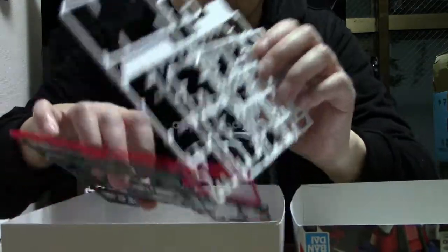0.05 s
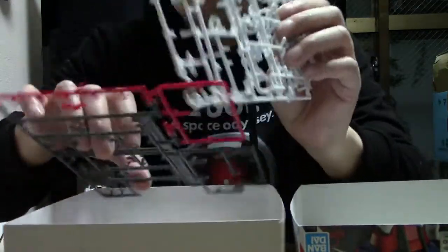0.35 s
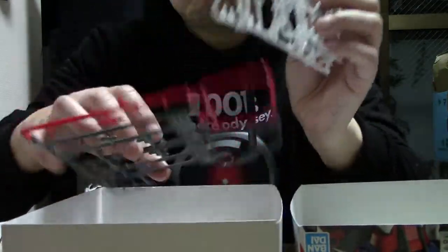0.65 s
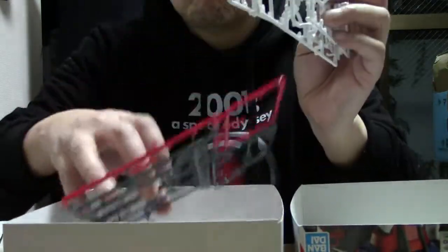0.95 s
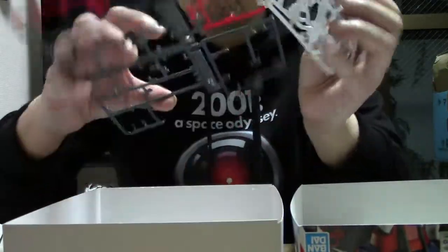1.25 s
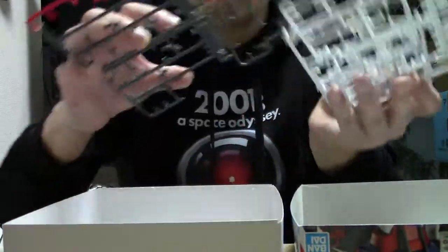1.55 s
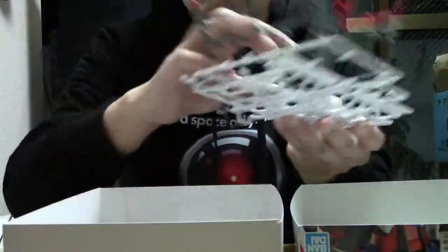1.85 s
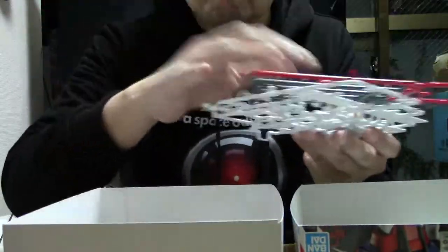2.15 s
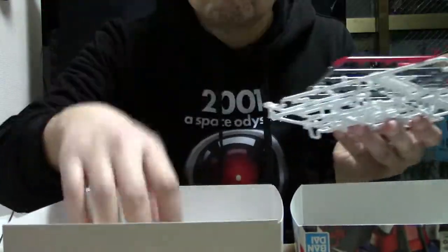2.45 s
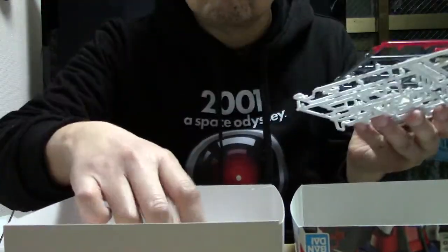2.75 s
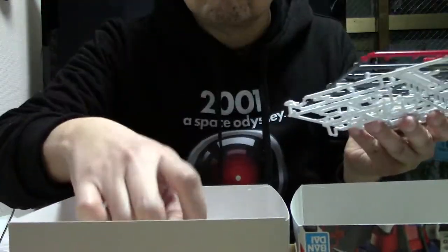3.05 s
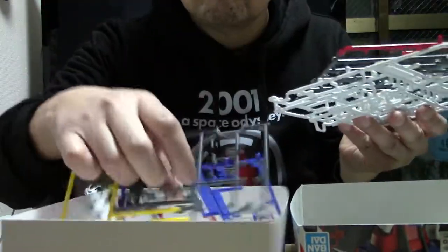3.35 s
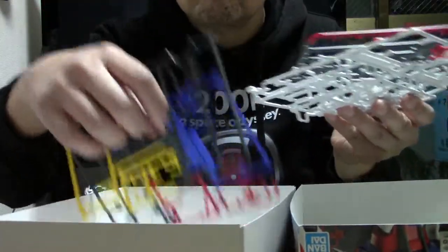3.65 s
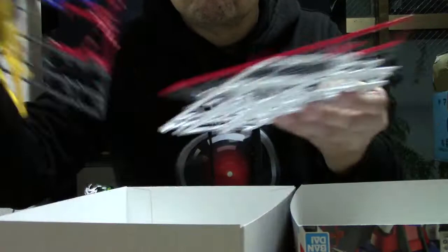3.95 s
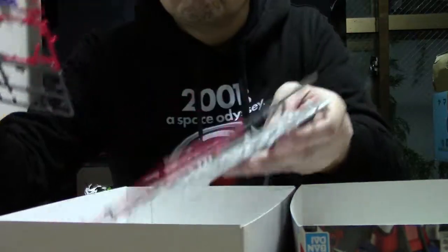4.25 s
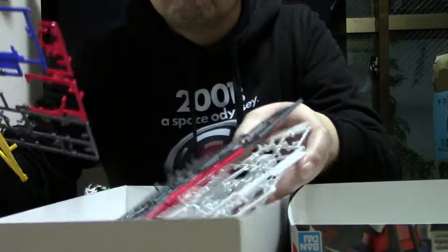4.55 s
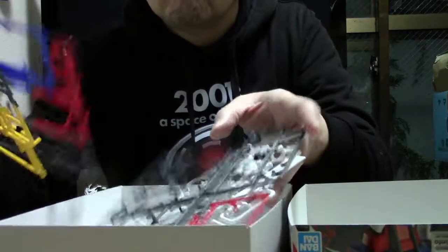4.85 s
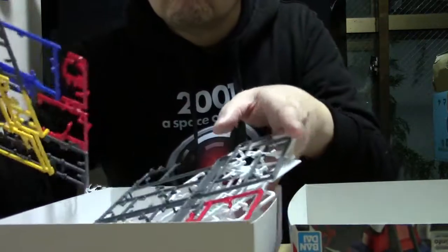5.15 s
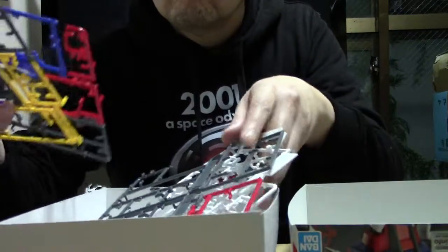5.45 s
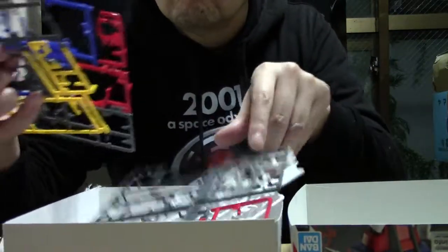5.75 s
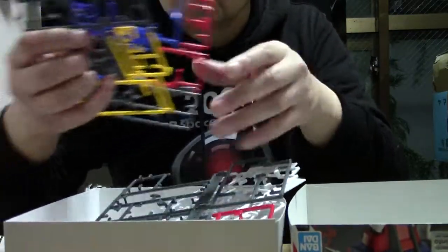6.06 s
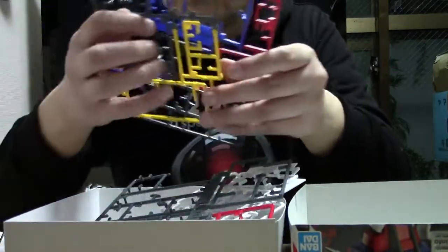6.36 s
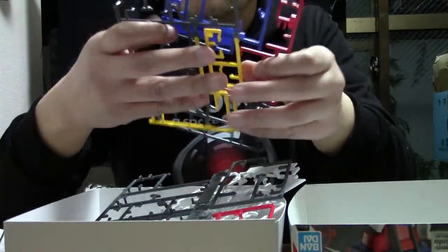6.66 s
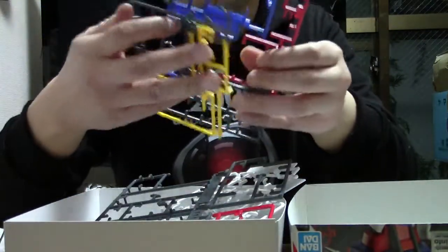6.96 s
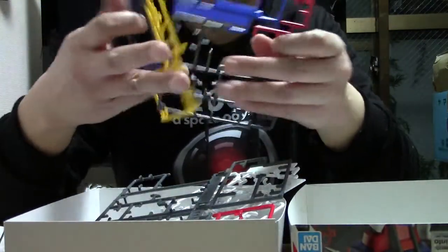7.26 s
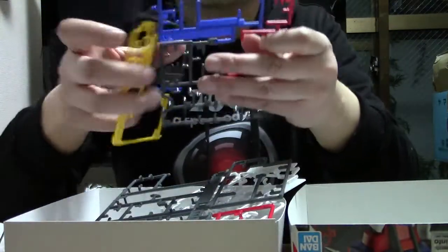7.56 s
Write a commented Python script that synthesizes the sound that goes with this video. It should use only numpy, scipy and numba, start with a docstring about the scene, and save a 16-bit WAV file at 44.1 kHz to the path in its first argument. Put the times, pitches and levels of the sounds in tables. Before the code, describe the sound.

Close, light clicks of hard plastic frames, with bursts of rattling, scraping and hollow knocks in a cardboard box.

```python
"""A small room, close up: hands sort the plastic runners of a model kit over a cardboard box.
Each runner is a lattice of thin bars that rings briefly when touched, with a bright tick from its edges.
Runners click together in the air, knock on the card panels as they are fetched and laid down,
and scrape over the card and each other in stick-slip flurries. Now and then the whole box is shoved.
A short room tail, steady air and a faint mains hum lie underneath."""
import sys
import numpy as np
from scipy import signal
from scipy.fft import rfft, irfft
from scipy.io import wavfile
from scipy.ndimage import uniform_filter1d
from numba import njit

SR = 44100
rng = np.random.default_rng(int(sys.argv[2]) if len(sys.argv) > 2 else 0)


def dump(signal):
    """Clip the signal to [-1, 1] and save it as 16-bit WAV at the path in sys.argv[1]."""
    limited = np.clip(np.atleast_2d(signal).T, -1, 1)
    pcm = np.round(limited * 32767).astype(np.int16)
    wavfile.write(sys.argv[1], SR, pcm)


N = 334719
TIME = np.arange(N) / SR
RING = TIME[:SR // 7]  # time axis of one hit
CLICK_HZ = 9140  # centre of a mid-air tick
# runner meets runner in the air: (time [s], tick level [dB], ring level [dB])
AIR_CLICKS = [(0.04, -43.5, -48), (0.157, -43, -44), (1.14, -26.5, -35), (1.227, -43.5, -48.5),
              (1.258, -55, -62), (1.291, -45, -52), (1.307, -45, -48), (1.313, -30, -36), (1.35, -40, -46),
              (1.407, -43.5, -50), (1.434, -37, -46), (1.614, -52.5, -57), (1.778, -46.5, -51),
              (1.92, -46.5, -47), (1.93, -39.5, -51), (1.94, -39.5, -51), (1.988, -36, -45),
              (2.021, -39, -47.5), (2.132, -44, -49), (2.219, -55.5, -56), (3.599, -55, -60),
              (3.634, -46.5, -50), (4.077, -37.5, -45), (4.18, -31.5, -43), (4.192, -38, -34.5),
              (4.204, -31.5, -41), (5.252, -45.5, -56), (6.04, -62, -54), (6.257, -38.5, -41.5),
              (6.637, -52, -55), (6.801, -43.5, -46.5), (6.922, -37, -48.5), (6.937, -38.5, -45),
              (7.04, -48, -58), (7.067, -46, -52), (7.104, -48.5, -47.5), (7.333, -39.5, -35.5),
              (7.346, -34.5, -34.5), (7.452, -35.5, -35.5), (7.522, -39, -41.5)]


def undb(db):
    """Decibels to gain."""
    return 10 ** (np.asarray(db) / 20)


def unit(x):
    """Scale to rms 1."""
    return x / np.sqrt(np.mean(x ** 2))


def at_hz(points, hz):
    """Read a (frequency [Hz], value) curve on a log-frequency axis."""
    f, value = np.transpose(points)
    return np.interp(np.log(np.maximum(hz, 1)), np.log(f), value)


def coloured(x, points):
    """EQ by a (frequency [Hz], gain [dB]) curve."""
    return irfft(rfft(x) * undb(at_hz(points, np.fft.rfftfreq(len(x), 1 / SR))), len(x))


def band(x, lo_hz, hi_hz, order=2):
    """Causal band-pass."""
    sos = signal.butter(order, [lo_hz, min(hi_hz, SR / 2 - 100)], "band", fs=SR, output="sos")
    return signal.sosfilt(sos, x)


def wander(rate_hz):
    """Random modulator: random values joined by ramps."""
    return np.interp(TIME * rate_hz, np.arange(4096), rng.standard_normal(4096))


def add(track, s, sound):
    """Mix a sound in at s seconds."""
    i = max(int(s * SR), 0)
    track[i:i + len(sound)] += sound[:max(N - i, 0)]


@njit
def vibrate(poles, starts, length):
    """Sum of freely decaying modes."""
    out = np.zeros(length)
    for m in range(len(poles)):
        z = starts[m]
        for i in range(length):
            out[i] += z.imag
            z *= poles[m]
            if z.real * z.real + z.imag * z.imag < 1e-9:
                break
    return out


def runner_modes(colour, t60_s, count):
    """A lattice of thin bars has many unevenly spaced modes; the higher ones tend to die sooner."""
    lo_hz, hi_hz = colour[0][0], colour[-1][0]
    hz = lo_hz + (hi_hz - lo_hz) * (np.arange(count) + rng.random(count)) / count
    t60 = t60_s * (hz / hz.mean()) ** -.35 * np.exp(0.29 * rng.standard_normal(count))
    return hz, t60, at_hz(colour, hz)


def strike(modes, centre_hz, octaves, punch=0, punch_s=0.004, retune=0.0356):
    """One hit: grip and load retune the modes, and the contact point favours those near a centre."""
    hz, t60, db = modes
    detune, luck = rng.standard_normal((2, len(hz)))
    hz = hz * (1 + retune * detune)
    weight = undb(db + 3 * luck) / (1 + (np.log2(hz / centre_hz) / octaves) ** 2)
    poles = np.exp((2j * np.pi * hz - np.log(1000) / t60) / SR)
    ring = vibrate(poles, weight * np.exp(2j * np.pi * rng.random(len(hz))), len(RING))
    t = RING[:SR // 50]
    # motion builds within a cycle, and is strongest before it has spread through the whole object
    ring[:len(t)] *= (1 - np.exp(-2 * t * centre_hz)) * (1 + punch * np.exp(-t / punch_s))
    return ring / np.sqrt(np.mean(ring[:SR // 100] ** 2))  # rms 1 over the first 10 ms


def background(air_db=-54, side_db=-10):
    """The bed: steady room air and microphone hiss, with mains hum."""
    # colour of the air and hiss: (frequency [Hz], relative level [dB])
    air_colour = [(12, -49), (30, -18), (55, -34), (80, -17), (135, -18.5), (165, -20.5), (200, -26.5),
                  (295, -17), (420, -25.5), (950, -30), (1400, -29), (2500, -34.5), (6000, -38.5),
                  (16000, -47.5)]
    # mains hum: (frequency [Hz], rms level [dB])
    hum_tones = [(48.6, -61), (199, -66)]
    mid, side = (unit(coloured(rng.standard_normal(N), air_colour)) for _ in range(2))
    side = coloured(side, [(60, 4), (170, 10.5), (500, 10.7), (2000, 5.5), (8000, 1.7), (15000, 3.7)])
    hum = sum(undb(db) * np.sqrt(2) * np.sin(2 * np.pi * hz * TIME) for hz, db in hum_tones)
    return undb(air_db) * (mid + undb(side_db) * np.array([side, -side])) + hum


def room(x, wet_db=-9, side_db=-9, build_s=0.00073):
    """Table and near walls return a short diffuse tail, slightly different left and right."""
    # decay of the room's tail: (frequency [Hz], t60 [s])
    decay = [(150, .22), (500, .22), (1400, .23), (3700, .22), (10000, .18), (16000, .14)]
    t = TIME[:SR // 2]
    edges_hz = np.geomspace(60, 18000, 9)
    returns = []
    for _ in range(2):
        tail = np.zeros(len(t))
        for lo, hi in zip(edges_hz, edges_hz[1:]):
            t60 = at_hz(decay, np.sqrt(lo * hi))
            tail += band(rng.standard_normal(len(t)), lo, hi) * undb(-60 * t / t60)
        tail *= 1 - np.exp(-(t / build_s) ** 2)
        returns.append(signal.oaconvolve(x, tail / np.linalg.norm(tail))[:N])
    mid, side = returns
    side = coloured(side, [(150, -8), (350, -27), (2000, -34), (5000, -4.5), (13000, -3.5)])
    return x + undb(wet_db) * (mid + undb(side_db) * np.array([side, -side]))


def shoves(decay_s=0.033):
    """Shoved on the table, the whole box gives a soft, low bump."""
    # bumps of the box: (time [s], centre [Hz], relative level [dB])
    bumps = [(2.49, 111, -39), (2.599, 99, -43.5), (2.76, 80.5, -45), (2.905, 96, -36), (3.432, 162, -34),
             (4.42, 156, -36.5), (4.601, 132, -40.5), (4.798, 129, -45.5), (4.928, 135, -39),
             (5.8, 114, -37), (5.859, 117, -51)]
    out = np.zeros(N)
    for s, hz, db in bumps:
        burst = rng.standard_normal(len(RING)) * np.exp(-RING / decay_s)
        add(out, s, undb(db) * unit(band(burst, hz / 1.8, hz * 1.37)) / 2)
    return out


def stroke(length_s, db, swell_db=0, grab_s=0.0039, let_go_s=0.013):
    """Envelope of one slide: it grabs, swells or eases while it lasts, and lets go."""
    t = TIME[:SR]
    held = undb(db + swell_db * np.minimum(t / length_s, 1))
    return held * np.minimum(t / grab_s, 1) * np.exp(-np.maximum(t - length_s, 0) / let_go_s)


def squeaks(sag_hz_per_s=2350, jitter=.06, flutter_db=3):
    """For a moment the slips fall into step and give an unsteady, falling tone."""
    # an edge squeaks along the card: (start [s], length [s], starting pitch [Hz], level [dB])
    chirps = [(3.227, 0.016, 1313, -33), (3.287, 0.038, 992, -40)]
    out = np.zeros(N)
    for s, length, start_hz, db in chirps:
        hz = start_hz - sag_hz_per_s * np.minimum(TIME[:SR], length)
        phase = 2 * np.pi * np.cumsum(hz * (1 + jitter * wander(370)[:SR])) / SR
        flutter = undb(flutter_db * wander(83)[:SR])
        add(out, s, np.sin(phase) * stroke(length, db) * flutter)
    return out


def friction(brush_bar_db=-7):
    """Three envelopes: how hard the drags and brushes drive the card, the bars and the hard edges."""
    # a runner dragged over card and pile:
    # (start [s], length [s], rattle level [dB], swell [dB], rub [dB re rattle], hiss [dB re rattle])
    drags = [(0, .27, -51, -5, 1.5, -8), (0.347, 0.072, -58, 8, -6, -12), (0.84, .14, -51.5, 8, -3.5, -9),
             (2.5, 0.13, -29.5, -9, 0, -8.5), (2.641, 0.13, -34, -6, 2, -9.5),
             (2.896, 0.029, -37.5, -3, 1, -13.5), (2.953, 0.17, -38.5, -5.5, -2.5, -10.5),
             (3.126, 0.15, -43.5, 6.5, -7.5, -14), (3.326, 0.13, -45.5, 20.5, -5, -5),
             (3.406, 0.024, -26.5, 0.5, -9, -7), (3.547, 0.092, -59.5, 11, -3, -7),
             (4.362, 0.18, -46.5, 6, 4.5, -7), (4.421, 0.096, -29, -16, -2, -9),
             (4.547, 0.14, -33.5, -2, 2, -7), (4.745, 0.1, -27.5, -4.5, -6, -9.5),
             (4.847, 0.11, -27.5, -2.5, -1.5, -5), (4.951, 0.22, -42, -4, 4.5, -8),
             (5.178, 0.43, -47, 4, -5, -9), (5.639, 0.17, -34.5, -8, 2, -7.5),
             (5.79, 0.11, -23.5, -10.5, 2.5, -9), (5.911, 0.07, -47, -5.5, 5, -12)]
    # runners brushing past each other in the air: (start [s], length [s], hiss level [dB])
    brushes = [(1.733, 0.064, -54.5), (4.049, 0.088, -47.5), (4.185, 0.05, -38), (7.33, 0.04, -44),
               (7.47, 0.099, -54)]
    card, bars, edges = np.zeros((3, N))
    for s, length, db, swell_db, rub_db, hiss_db in drags:
        for power, share_db in (card, rub_db), (bars, 0), (edges, hiss_db):
            add(power, s, stroke(length, db + share_db, swell_db) ** 2)
    for s, length, db in brushes:
        for power, share_db in (bars, brush_bar_db), (edges, 0):
            add(power, s, stroke(length, db + share_db) ** 2)
    return np.sqrt([card, bars, edges])


def stick_slip(base_rate_hz=4500, spread_db=3):
    """A dense train of tiny catches of unequal size, in flurries, levelled over 50 ms."""
    size = undb(spread_db * np.minimum(rng.exponential(size=N), 4))
    caught = rng.random(N) < base_rate_hz / SR * undb(2 * wander(60))
    train = caught * size * rng.choice([-1, 1], N)
    return train / np.sqrt(uniform_filter1d(train ** 2, SR // 20).clip(0) + 1e-6)


def scrapes(card, bars, ticks, drive, card_db=-4.5, bar_db=-2.5, hiss_db=-2.5, ring_db=-7):
    """Catches sound straight from the contact and ring card and runner, at new resonances every 20 ms."""
    catches = stick_slip()
    hop = SR // 50
    window = np.sin(np.pi * np.arange(2 * hop) / (2 * hop))
    # (modes, direct scrape, ring centre [Hz], trim [dB])
    layers = [(card, band(catches, 296, 715), 540, card_db),
              (bars, band(catches, 1090, 3610, order=3), 1900, bar_db),
              (ticks, band(catches, 5260, 8000, order=1), 5800, hiss_db)]
    out = np.zeros(N)
    for ((hz, t60, db), direct, centre_hz, trim_db), envelope in zip(layers, drive):
        pressed = hz, t60 * .6, db  # rubbing contact shortens the ring
        rings = np.zeros(N)
        for i in range(0, N - 2 * hop, hop):
            ring = strike(pressed, centre_hz, octaves=0.94)[:2 * hop]
            add(rings, i / SR, signal.fftconvolve(window * catches[i:i + 2 * hop], ring))
        out += envelope * undb(trim_db) * unit(unit(direct) + undb(ring_db) * unit(rings))
    return out


def jolts(card, bars, ticks, drive, count=190, card_db=-5, bar_db=-4, tick_db=-1, spread_db=3):
    """A sliding runner bumps over the bars beneath it: small knocks, as strong as the stroke is."""
    out = np.zeros(N)
    trims_db = np.array([card_db, bar_db, tick_db])
    for k in range(count):
        i = int((k + rng.random()) / count * N)
        gains = undb(spread_db * (2 * rng.random() - 0.5) + trims_db) * drive[:, i]
        thump = strike(card, 500, octaves=0.92)
        clack = strike(bars, 1150, octaves=0.42, punch=0.26)
        tick = strike(ticks, 6100, octaves=0.78, punch=.5)
        add(out, i / SR, gains @ np.array([thump, clack, tick]))
    return out


def settling(ticks, count=2, below_db=-11, fade_db_per_s=140, spread_db=2):
    """Loose parts settle after each click with stray ticks, the later the fainter."""
    out = np.zeros(N)
    for s, top_db, _ in AIR_CLICKS:
        for _ in range(count):
            db = top_db + below_db + spread_db * rng.standard_normal()
            delay_s = rng.uniform(.012, .068)
            tick = strike(ticks, CLICK_HZ, octaves=1.0, punch=.5)
            add(out, s + delay_s, undb(db - fade_db_per_s * delay_s) * tick)
    return out


def clicks(bars, ticks, bar_db=-4, frame_db=-7, tick_db=-1, bounce_db=-7, graze_db=-20):
    """Hand-held runners graze, meet and bounce once; the free frame pings on for a moment."""
    # longer-lived modes of a runner's outer frame: (frequency [Hz], t60 [s], relative level [dB])
    frame_modes = [(1200, 0.057, -21), (2700, 0.18, -2), (3106, 0.12, 3), (3450, 0.065, 2),
                   (3880, 0.12, -1.5), (4090, 0.1, 2.5), (4870, 0.13, -3), (6420, 0.1, 1)]
    frame = np.transpose(frame_modes)
    out = np.zeros(N)
    for s, top_db, ring_db in AIR_CLICKS:
        lead_s, lag_s = rng.uniform(.001, .003, 2)
        hz = CLICK_HZ * np.exp(0.062 * rng.standard_normal())
        add(out, s - lead_s, undb(top_db + graze_db) * strike(ticks, hz, octaves=1.0))
        add(out, s, undb(ring_db + bar_db) * strike(bars, 3450, octaves=1.0, punch=0.22, retune=0.0693))
        add(out, s, undb(ring_db + frame_db) * strike(frame, 3900, octaves=0.7, retune=0.0315))
        add(out, s, undb(top_db + tick_db) * strike(ticks, hz, octaves=0.53, punch=0.17))
        add(out, s + lag_s, undb(top_db + bounce_db) * strike(ticks, 13000, octaves=0.43, punch=2.1))
    return out


def snaps():
    """A hard edge snaps past a bar: a lone spike, a fraction of a millisecond long."""
    # edges letting go: (time [s], peak level [dB])
    releases = [(1.1416, -11), (2.4903, -5), (3.429, -8), (4.3417, -6), (4.5792, -4.5), (5.638, -5)]
    out = np.zeros(N)
    spike = band(signal.unit_impulse(len(RING)), 1100, 6000, order=1)
    for s, db in releases:
        add(out, s, undb(db) * spike / spike.max())
    return out


def knocks(card, bars, ticks, card_db=-3.5, bar_db=-1, tick_db=-3):
    """A runner lands: the card thumps, the bars clack, the hard edge ticks."""
    # hits on the box or the pile in it:
    # (time [s], thump level [dB], thump centre [Hz], clack level [dB], clack centre [Hz], tick [dB])
    landings = [(0.112, -49, 510, -45, 1500, -56), (0.199, -44, 590, -39.5, 1630, -44),
                (0.327, -37.5, 487, -33, 2300, -43), (0.597, -40, 580, -35.5, 1720, -41),
                (0.828, -25, 353, -27, 1560, -48), (0.954, -34, 335, -39, 1900, -53),
                (2.49, -17.5, 318, -20, 1500, -30.5), (2.502, -28, 304, -31, 1400, -29.5),
                (2.542, -41, 320, -31.5, 1600, -45), (2.598, -32, 360, -40, 1600, -37),
                (2.662, -30.5, 410, -27.5, 1800, -35.5), (2.723, -27, 308, -33, 1500, -44.5),
                (2.884, -42, 435, -40, 2170, -45.5), (2.973, -41, 470, -34.5, 1970, -47),
                (3.018, -42, 614, -31, 1830, -38.5), (3.082, -36, 550, -32.5, 1990, -42),
                (3.234, -40, 356, -30.5, 1360, -44), (3.429, -19, 590, -16, 2180, -27),
                (3.433, -25.5, 587, -21, 1830, -26.5), (3.441, -34, 473, -26.5, 1700, -37),
                (3.449, -31, 397, -33, 1510, -38), (4.337, -28, 432, -28.5, 1270, -35),
                (4.342, -30.5, 440, -26, 1640, -27.5), (4.417, -22.5, 517, -21, 1620, -26.5),
                (4.429, -47, 460, -26, 1570, -32), (4.462, -34, 330, -30.5, 1420, -47),
                (4.531, -32, 660, -25, 1910, -31), (4.579, -29, 583, -19, 1610, -25.5),
                (4.752, -24.5, 656, -23, 1760, -22), (4.789, -24.5, 720, -30, 1400, -32),
                (4.925, -25.5, 540, -15.5, 2200, -45), (4.957, -31, 460, -25, 1940, -52),
                (4.987, -37, 626, -24, 1650, -36), (5.032, -41, 410, -33, 1520, -41),
                (5.07, -31, 626, -25.5, 1950, -51), (5.149, -36.5, 434, -39, 1300, -46),
                (5.335, -28, 460, -37, 2020, -41), (5.397, -34.5, 500, -46, 2000, -63),
                (5.599, -33, 506, -49, 1300, -62), (5.637, -46, 640, -21.5, 1750, -36),
                (5.745, -49, 540, -28, 1780, -40), (5.794, -17.5, 600, -18, 1940, -26.5),
                (5.815, -23.5, 376, -24.5, 1200, -46), (5.853, -21, 420, -29, 1100, -29.5),
                (5.897, -25, 392, -38, 1900, -45)]
    out = np.zeros(N)
    for s, thump_db, card_hz, clack_db, bar_hz, top_db in landings:
        thump = undb(thump_db + card_db) * strike(card, card_hz, octaves=0.35, punch=0.5, retune=0.022)
        clack = undb(clack_db + bar_db) * strike(bars, bar_hz, octaves=.72, punch=.5)
        tick = undb(top_db + tick_db) * strike(ticks, 6500, octaves=0.59, punch=0.25)
        add(out, s, thump + clack + tick)
    return out


def scene():
    """Slides and hits in the room, over the bed; runners ring longer in the hand than on the pile."""
    # modes of the cardboard panels: (frequency [Hz], t60 [s], relative level [dB])
    card_modes = [(122, 0.048, 8), (174.6, 0.38, -5), (209, 0.037, -5.5), (298.6, 0.24, -5),
                  (327.8, 0.088, -7), (372.4, 0.056, -2), (424, 0.11, -8.5), (507, 0.024, -7.5),
                  (534.4, 0.1, -8), (595, 0.031, -5.5), (617.6, 0.07, -3), (706, 0.031, 0),
                  (812, 0.022, 2.5), (920, 0.038, 3.5)]
    # how strongly the bars radiate: (frequency [Hz], relative level [dB])
    bar_colour = [(750, 14), (950, -4), (1150, 8), (1600, -4.5), (2000, 4.5), (2400, -0.5), (2800, 0.5),
                  (3500, 5), (4000, -0.5), (4600, -7.5)]
    # how strongly the hard edges radiate: (frequency [Hz], relative level [dB])
    tick_colour = [(4300, 11.5), (5300, 0), (7000, 4), (9000, 2.5), (11000, 0.5), (13500, 1.5),
                   (16000, -11)]
    card = np.transpose(card_modes)
    held_bars = runner_modes(bar_colour, t60_s=.046, count=36)
    held_ticks = runner_modes(tick_colour, t60_s=.028, count=90)
    piled_bars = runner_modes(bar_colour, t60_s=.033, count=52)
    piled_ticks = runner_modes(tick_colour, t60_s=.021, count=100)
    box = card, piled_bars, piled_ticks
    drive = friction()
    slides = scrapes(*box, drive) + jolts(*box, drive) + squeaks()
    hits = clicks(held_bars, held_ticks) + settling(held_ticks) + knocks(*box) + snaps() + shoves()
    return room(slides + hits) + background()


def record(dry):
    """The recorder cuts the top and sits slightly off zero."""
    top_hz, dc_offset = 16300, .0105
    return signal.sosfilt(signal.ellip(8, .2, 70, top_hz, fs=SR, output="sos"), dry) + dc_offset


dry = scene()
out = record(dry)
dump(out)
```